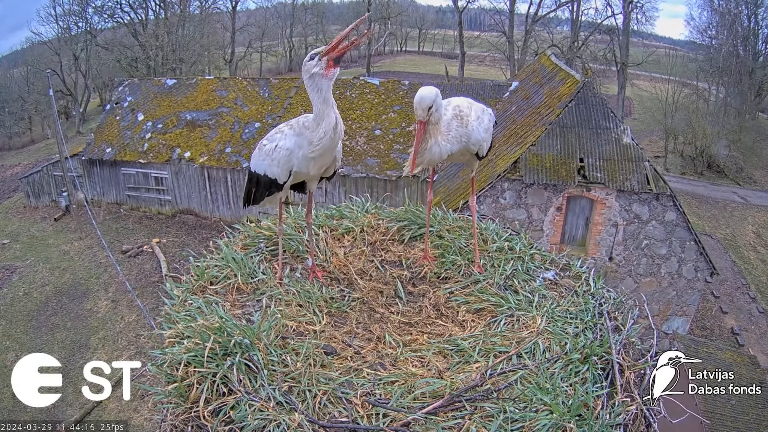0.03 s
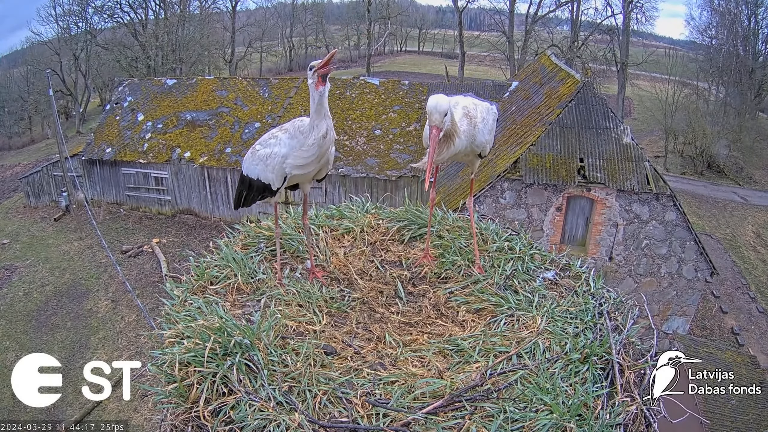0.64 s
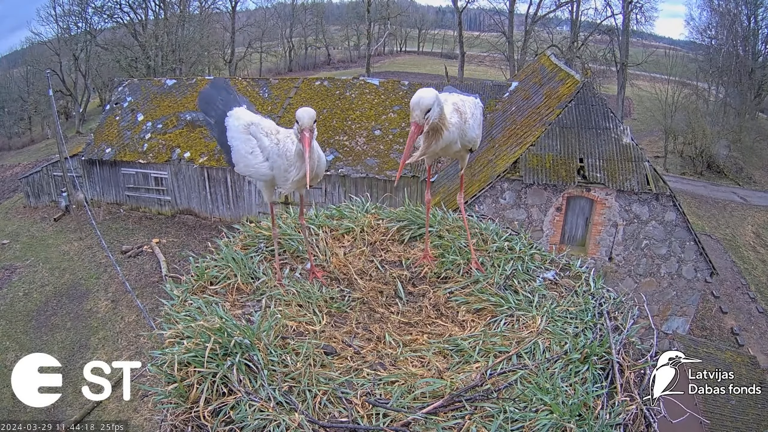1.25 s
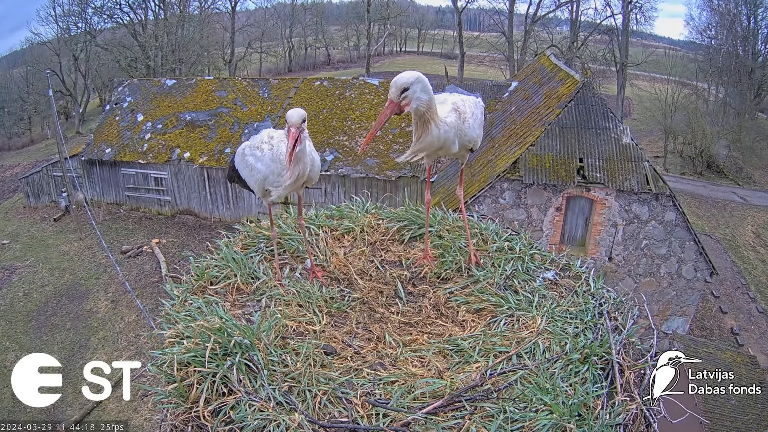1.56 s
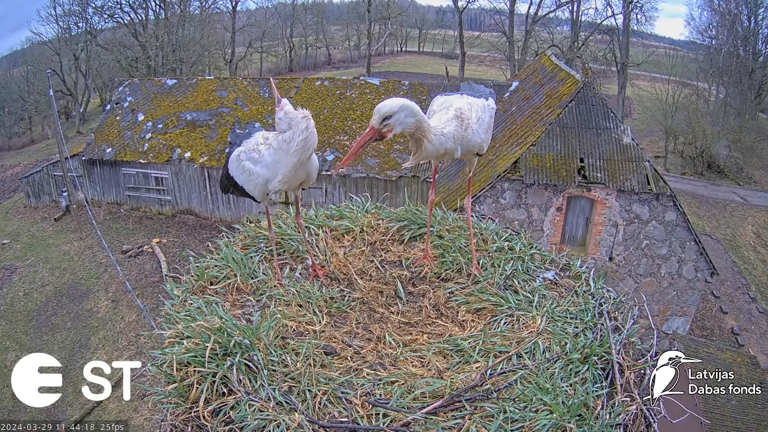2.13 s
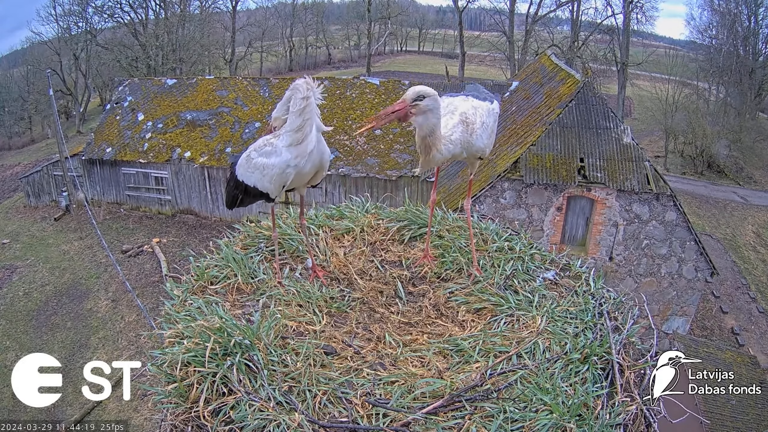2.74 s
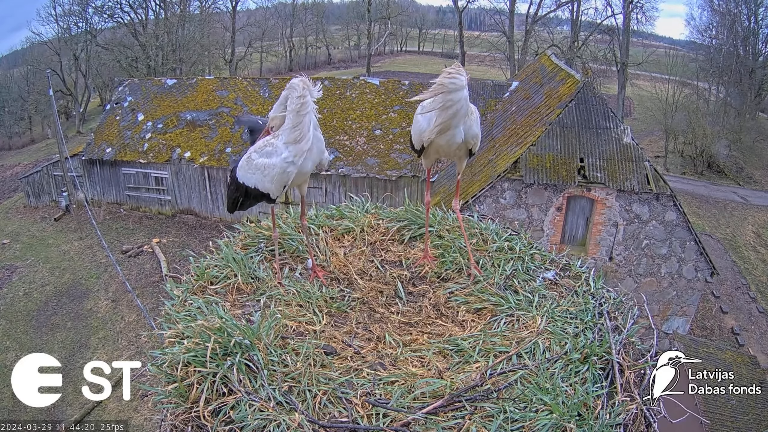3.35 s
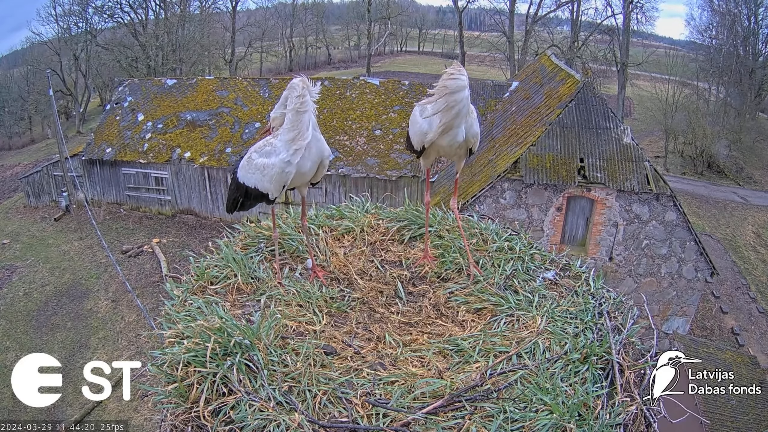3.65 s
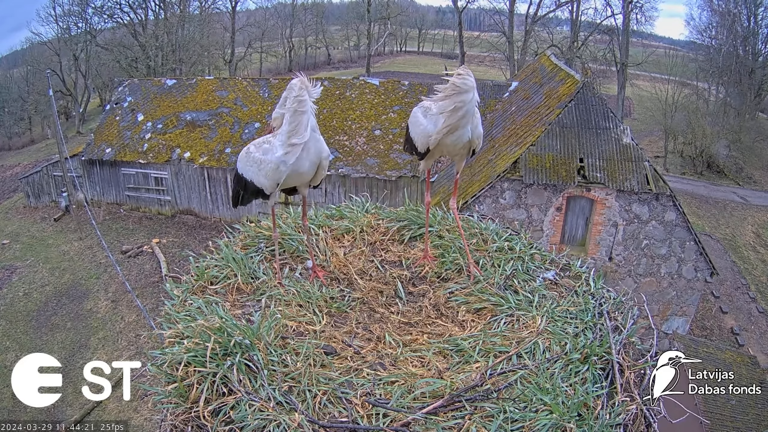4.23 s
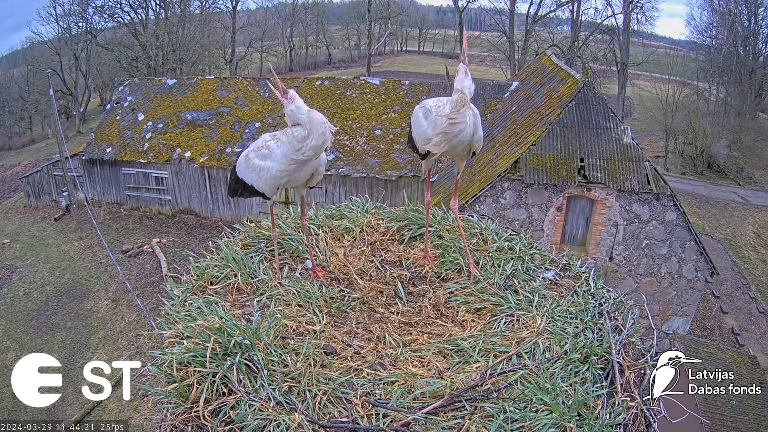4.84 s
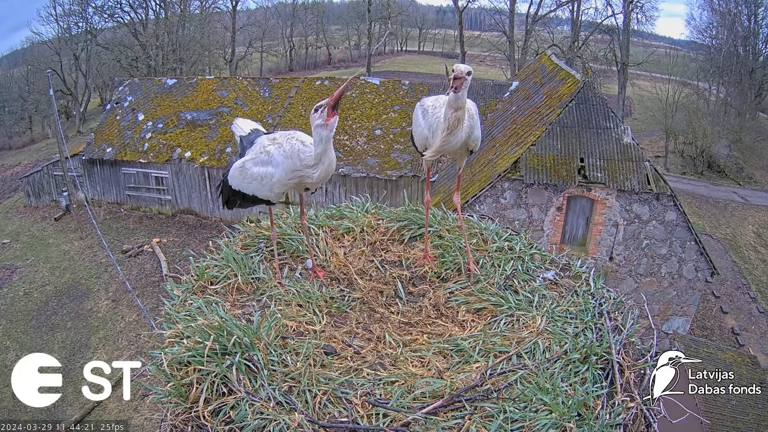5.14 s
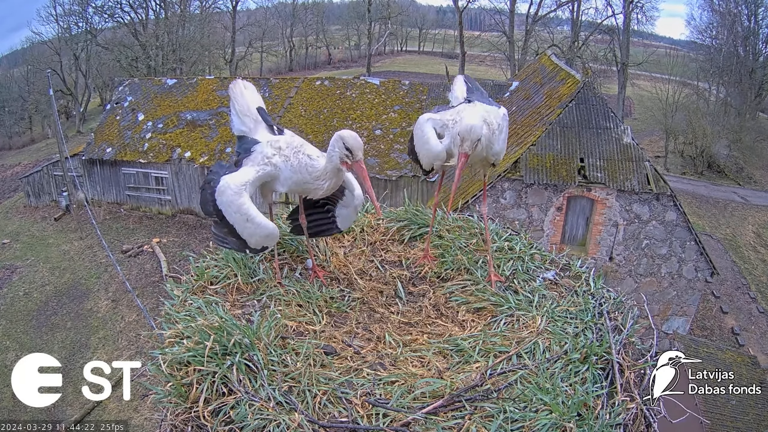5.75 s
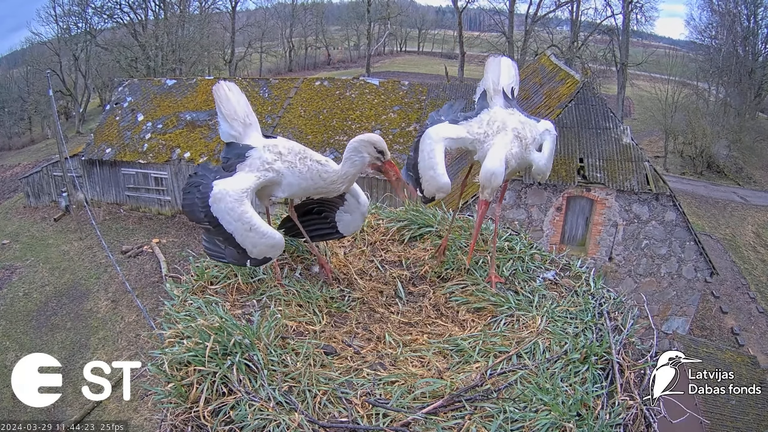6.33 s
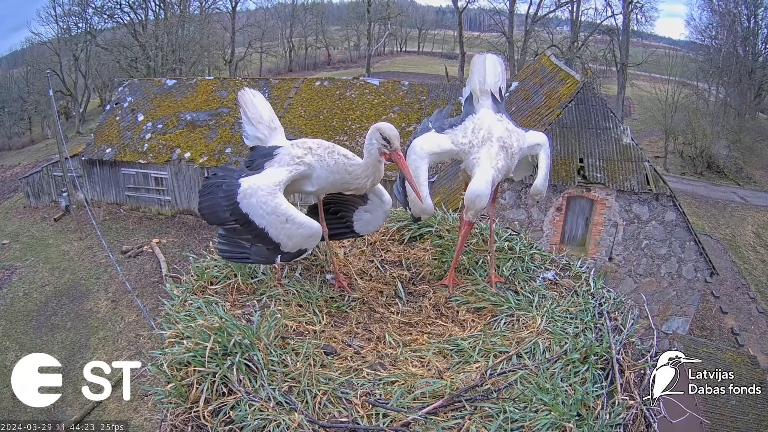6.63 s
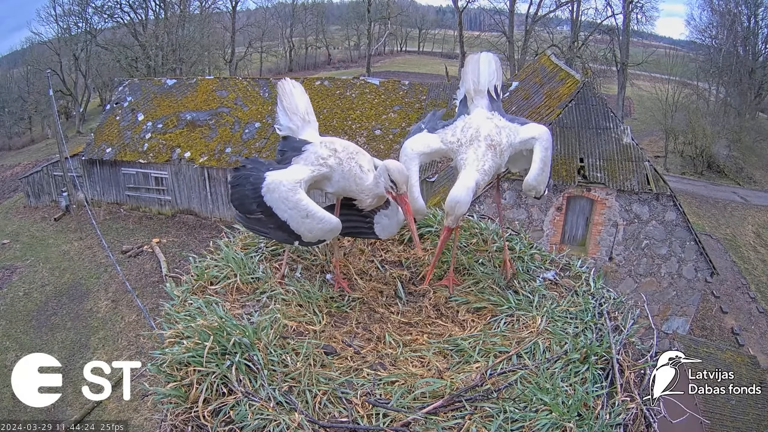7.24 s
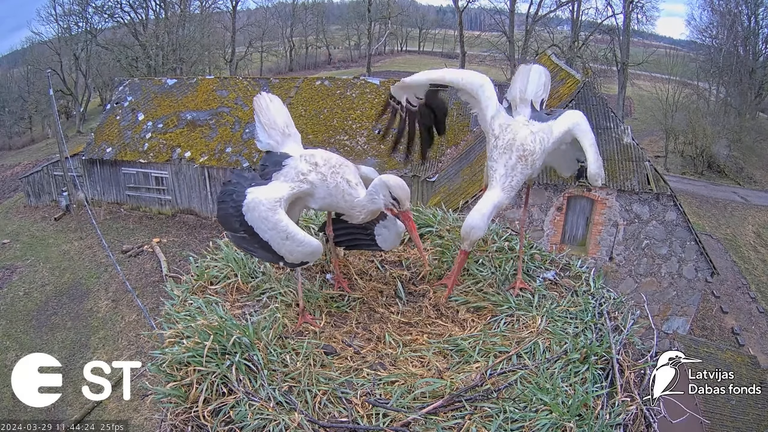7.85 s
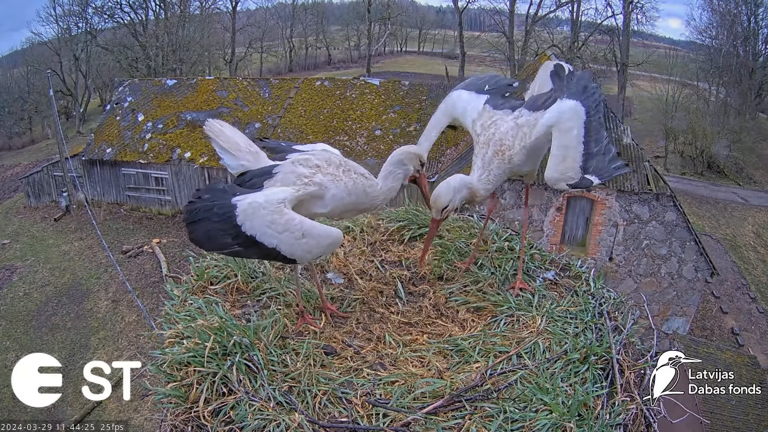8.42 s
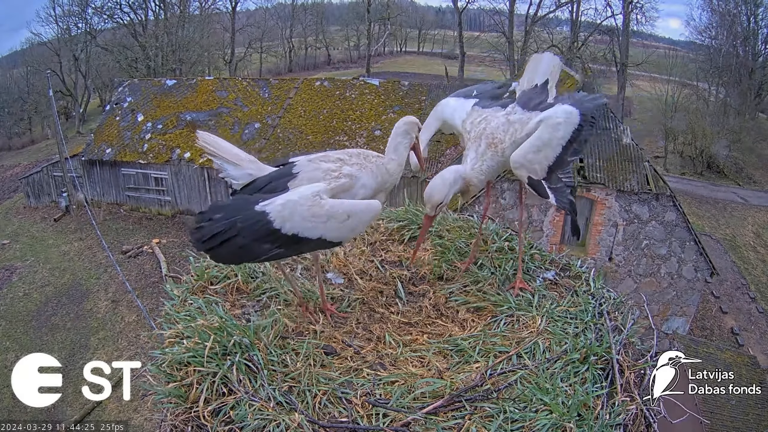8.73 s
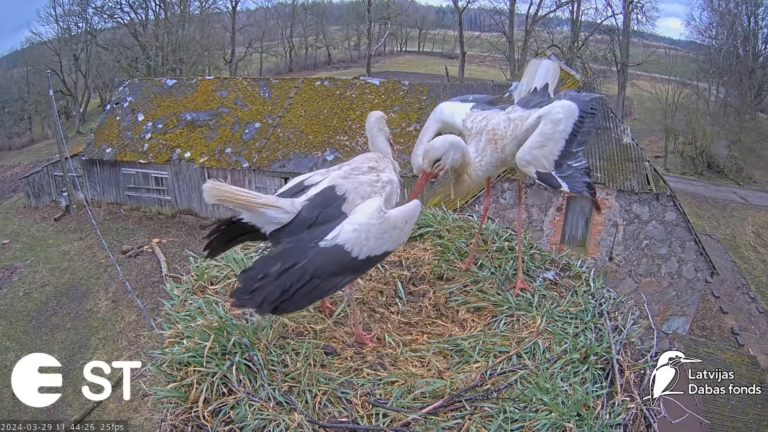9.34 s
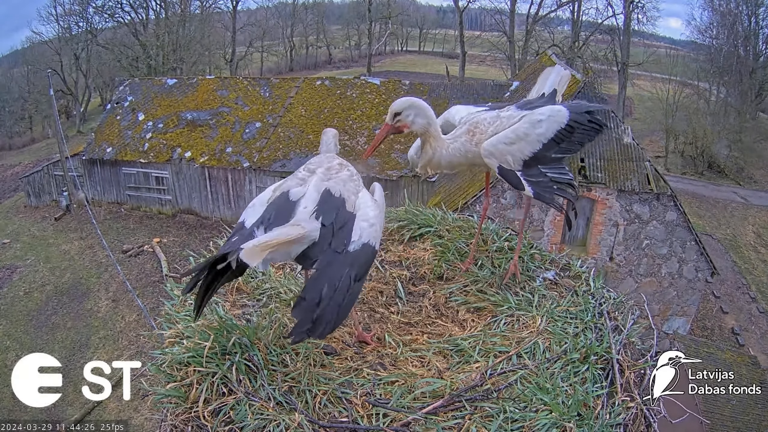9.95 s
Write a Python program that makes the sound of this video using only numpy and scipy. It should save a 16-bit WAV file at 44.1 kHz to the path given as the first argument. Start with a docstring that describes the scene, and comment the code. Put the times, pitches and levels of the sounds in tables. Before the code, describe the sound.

After a short hiss, a pair of storks keep up a fast, dry bill clattering outdoors over soft gusts of wind.

```python
"""A short hiss over light wind, then two white storks clatter their bills on a rooftop nest.
Each speeds up while it throws its head back; they drift in and out of step. A clap is a dry tick
plus a short swelling ring of bill, throat and pouch, whose pitches follow the neck's posture.
Feathers rustle, gusts buffet the microphone, a songbird trills far off."""
import sys
import numpy as np
from scipy import signal
from scipy.fft import rfft, irfft, next_fast_len
from scipy.io import wavfile
from scipy.ndimage import uniform_filter1d

SR = 44100
rng = np.random.default_rng(int(sys.argv[2]) if len(sys.argv) > 2 else 0)


def store_pcm(level_fs):
    """Save levels as 16-bit WAV."""
    pcm = np.round(np.clip(level_fs, -1, 1) * 32767).astype(np.int16)
    wavfile.write(sys.argv[1], SR, np.atleast_2d(pcm).T)


N = 440118
CLAP_SAMPLES = 1024
TIME_S, AGE_S = np.arange(N) / SR, np.arange(CLAP_SAMPLES) / SR

# spectra of outdoor air, wind rumble, feathers and straw, hiss: f/Hz, level/dB
AIR_SPECTRUM = [(100, -7.5), (400, -2), (1100, -2), (1800, -0.5), (2600, 14), (3500, 2.5), (6000, -7),
                (9000, -13), (13500, -8.5)]
WIND_SPECTRUM = [(15, 3.5), (28, 7), (50, -4.5), (100, -16.5), (200, -30.5), (400, -41.5), (1000, -73)]
RUSTLE_SPECTRUM = [(800, -31), (2000, 15.5), (2800, 19.5), (3600, -1), (4700, 4), (6500, -11),
                   (9000, -15.5), (14000, -40)]
HISS_SPECTRUM = [(290, -85), (500, -66), (898, -31), (1360, -12), (2250, -17.5), (2560, 3.5), (2820, -9.5),
                 (3880, -7), (5200, -22.5), (8590, -31), (14000, -56)]
# spectra of small eddies and of the farmyard's echo: f/Hz, level/dB
EDDY_SPECTRUM = [(40, -14.5), (110, 11), (250, 0), (500, -11.5), (1500, -54.5)]
YARD_SPECTRUM = [(300, 7.5), (1700, -12), (2350, -2), (2750, .5), (4500, -14), (9000, -14)]
# songbird trills: start/s, end/s, note onset f/Hz
TRILLS = [(0.039, 0.094, 3610), (1.899, 2.15, 4370), (3.797, 4.849, 4830), (8.528, 9.5, 4700)]
# wind gusts: t/s, relative peak level/dB, half width/s
GUSTS = [(0.847, -32.5, .05), (1.296, -33, 0.18), (1.78, -24, 0.14), (3.098, -38, 0.54), (3.398, -35, .06),
         (3.85, -26.5, .07), (4.383, -33, 0.12), (4.688, -32, .03), (5.482, -25.5, 0.18),
         (6.09, -24.5, 0.07), (6.978, -28.5, 0.33), (7.279, -27.5, 0.051), (7.514, -27.5, 0.019),
         (8.724, -29, .08), (9.02, -35, 0.15), (9.75, -30, 0.035)]
# stirring of feathers and straw: t/s, relative level/dB
RUSTLE_LEVELS = [(.5, -68.5), (1.2, -54), (2.7, -61.5), (4.1, -56.5), (5, -59), (5.4, -46), (5.8, -72),
                 (6.85, -52), (7.4, -68), (9, -58.5), (9.98, -88.5)]
# horn edges meeting: f/Hz, level with bill down/dB, boost with head back/dB
TICK_SPECTRUM = [(200, -54, 1.5), (330, -22.5, 14), (484, -18, 22), (820, -19, 16), (1318, -10, 19),
                 (1650, 4.5, 8.5), (3560, -1.5, 5), (3880, -5, 11), (4260, 2, 8), (5340, -5.5, 11),
                 (6690, -12, 9), (6900, -9.5, 7), (7480, -12.5, 9), (9790, -23, 12.5), (11800, -27, 7.5),
                 (14200, -34.5, 8)]
# runs of claps, each lasting until the next: start/s, claps, slowing per clap/ms
LEAD_RUNS = [(.5247, 2, 2.5), (.7646, 6, 0), (1.431, 4, -2.5), (1.8699, 4, 0.5), (2.2941, 4, -1.45),
             (2.7026, 4, -4), (3.0414, 10, 0.34), (3.8371, 5, 0.44), (4.2553, 8, 1.6), (4.9815, 5, 1.5),
             (5.489, 6, -.5), (6.1067, 6, 0), (6.7246, 10, 0.04), (7.7761, 4, 1), (8.206, 4, -0.14),
             (8.6235, 6, 0.6), (9.2767, 4, -1), (9.7077, 2, 6.5), (9.9344, 1, 3)]
MATE_RUNS = [(.3326, 2, -5.5), (.4911, 7, -0.27), (1.5264, 3, -2), (1.9531, 4, -8.5), (2.427, 7, 0),
             (3.1384, 11, 0.38), (4.269, 4, 5), (4.7137, 4, 4), (5.25, 3, 5.5), (5.6869, 5, -0.04),
             (6.4238, 6, 0.66), (7.3306, 4, -0.6), (7.9239, 2, -14), (8.2194, 5, 3), (8.9694, 4, 3.5),
             (9.5494, 1, -5.5)]
# bill ring as effort and gape change: t/s, level/dB, f/Hz
LEAD_BILL = [(.52, -7, 2400), (.8, -6.5, 2326), (1.45, -7.5, 2287), (1.8, -11, 2290), (2.15, -11.5, 2385),
             (2.65, -13.5, 2464), (2.85, -10.5, 2413), (3.22, -18, 2300), (3.7, -15.5, 2368),
             (4.65, -13, 2385), (5.1, -9.5, 2427), (5.9, -5, 2432), (6.85, -6.5, 2367), (7.6, -5, 2473),
             (8.05, -9.5, 2367), (8.6, -14, 2417), (9.3, -7, 2470), (9.7, -20.5, 2610)]
MATE_BILL = [(.42, -33, 2500), (.49, -19.5, 2500), (.94, -25, 2710), (1.08, -17, 2130), (1.9, -28, 2080),
             (2.2, -23.5, 2560), (4.1, -23, 2620), (4.6, -35.5, 2660), (4.84, -21, 2670), (4.97, -18, 2100),
             (5.25, -17, 2080), (5.54, -8.5, 2620), (7.2, -8, 2527), (7.48, -8.5, 2310), (7.92, -7.5, 2200),
             (8.37, -45.5, 2680), (8.81, -18.5, 2430), (8.97, -29.5, 2500), (9.55, -44.5, 2460)]
# throat ring as the neck bends: t/s, level/dB re bill, f/Hz
LEAD_THROAT = [(.52, -5.5, 1840), (.8, -8.5, 1716), (2.18, -3, 1700), (2.4, 0.5, 2090), (2.68, 2, 2070),
               (2.95, -12, 1694), (3.3, -7, 1370), (4.6, -14.5, 1620), (5.18, -10, 1530), (5.38, -4, 1837),
               (6.5, -7, 1815), (6.75, -7.5, 1670), (8.1, -4.5, 1780), (8.55, 2, 1890), (9.25, -4.5, 1690),
               (9.45, -7, 1780), (9.62, 3, 2005)]
MATE_THROAT = [(.4, 4, 1970), (.5, -3, 1840), (.94, 6.5, 1960), (1.08, -24, 1740), (1.65, -5, 1740),
               (2.1, 2.5, 1950), (2.85, -14, 1830), (4.2, -9.5, 1760), (4.7, -1.5, 1870), (5.1, -13, 1670),
               (5.6, -10.5, 2070), (6.3, -8.5, 2190), (7.3, -4.5, 2230), (7.5, -15, 1870),
               (7.9, -18.5, 1890), (8.1, 6, 2200), (9, -8, 2210)]
# bill overtone: t/s, level/dB re bill
LEAD_OVERTONE = [(.5, -8), (1, -3.5), (2.1, -3.5), (2.5, 0.5), (3.4, -16.5), (5, -10), (7.9, -8),
                 (8.4, -11.5), (9.45, -8), (9.7, -30)]
MATE_OVERTONE = [(.5, -68), (1.2, -15), (2.9, -14), (3.3, -23), (4.8, -21), (5.05, -2.5), (5.6, -21),
                 (6.2, -32), (8, -11.5)]


def from_db(db):
    """Decibels to gain."""
    return 10 ** (np.asarray(db) / 20)


def at_time(rows, t_s):
    """A table's value columns, interpolated at t_s."""
    times_s, *columns = np.transpose(rows)
    return [np.interp(t_s, times_s, column) for column in columns]


def coloured(x, spectrum):
    """Minimum-phase filter following rows of f/Hz, level/dB."""
    size = 2 * next_fast_len(len(x))
    hz, db = np.transpose(spectrum)
    grid_hz = np.maximum(np.arange(size // 2 + 1) * SR / size, 1)
    cepstrum = irfft(np.log(from_db(np.interp(np.log(grid_hz), np.log(hz), db))))
    cepstrum[1:size // 2] *= 2
    cepstrum[size // 2 + 1:] = 0
    return irfft(rfft(x, size) * np.exp(rfft(cepstrum)))[:len(x)]


def noise(spectrum):
    """Steady coloured noise, rms 1."""
    x = coloured(rng.standard_normal(N), spectrum)
    return x / np.sqrt(np.mean(x ** 2) + 1e-20)


def drift(rate_hz):
    """Random wander, spread near 1."""
    knots = rng.standard_normal(4096)
    return np.interp(TIME_S * rate_hz, np.arange(len(knots)), knots)


def swell(start_s, end_s, attack_s, release_s):
    """Gaussian rise, hold at 1, Gaussian fall."""
    outside = np.maximum((start_s - TIME_S) / attack_s, (TIME_S - end_s) / release_s)
    return np.exp(-np.clip(outside, 0, 10) ** 2)


def farmyard(x, scatter_db, t60_s):
    """Roofs and trees scatter a thin tail."""
    age_s = TIME_S[:2 * SR]
    tail = rng.standard_normal(len(age_s)) * from_db(-60 * age_s / t60_s) * (1 - np.exp(-age_s / .011))
    tail *= from_db(scatter_db) / np.sqrt(np.sum(tail ** 2))
    return signal.fftconvolve(x, coloured(tail, YARD_SPECTRUM))[:N]


def nest(x, scatter_db, fade_s):
    """Straw and twigs reflect a blur within milliseconds."""
    blur = rng.standard_normal(CLAP_SAMPLES) * AGE_S * np.exp(-AGE_S / fade_s)
    return signal.fftconvolve(x, from_db(scatter_db) * blur / np.sqrt(np.sum(blur ** 2)))[:N]


def songbird(level_db, fall_per_s, note_s, period_s):
    """Runs of short falling whistles from far trees; no two alike."""
    out, age_s = np.zeros(N + SR), TIME_S[:SR // 8]
    envelope = np.sin(np.pi * np.minimum(age_s / note_s, 1)) ** 2
    chance = rng.standard_normal((len(TRILLS), 64, 4))
    for (start_s, end_s, hz), notes in zip(TRILLS, chance):
        for t_s, luck in zip(np.arange(start_s, end_s, period_s), notes):
            pitch_hz = hz * from_db(luck[0] / 2) * np.exp(-fall_per_s * (1 + luck[2] / 2) * age_s)
            whistle = np.sin(2 * np.pi * np.cumsum(pitch_hz) / SR)
            at = int(max(t_s + period_s * luck[3] / 5, 0) * SR)
            out[at:at + len(age_s)] += from_db(level_db + 2 * luck[1]) * envelope * whistle
    return out[:N]


def wind(breeze_db, buffet_db, rumble_gain_db, eddy_db):
    """Rumble on the microphone; strong gusts also shed smaller, higher eddies."""
    gust_power = sum((from_db(db) * swell(t_s, t_s, half_s, half_s)) ** 2 for t_s, db, half_s in GUSTS)
    gust_db = 10 * np.log10(from_db(breeze_db) ** 2 + gust_power)
    rumble = noise(WIND_SPECTRUM)
    rumble /= np.sqrt(uniform_filter1d(rumble ** 2, size=SR // 5) + .098)   # even out its own swells
    rumble *= from_db(gust_db + rumble_gain_db)
    buffet = from_db(buffet_db * drift(30))
    eddies = noise(EDDY_SPECTRUM) * from_db(buffet_db * drift(71))
    eddies *= from_db(eddy_db + 1.36 * (gust_db + 31.5))
    return buffet * (rumble + eddies)


def rustle(gain_db, flicker_db):
    """Feathers and straw: flickering noise."""
    level_db, = at_time(RUSTLE_LEVELS, TIME_S)
    return from_db(level_db + gain_db + flicker_db * drift(30)) * noise(RUSTLE_SPECTRUM)


def hiss(level_db):
    """One puff of noise opens the display."""
    return from_db(level_db) * swell(.3555, .382, attack_s=.029, release_s=.033) * noise(HISS_SPECTRUM)


def ring(hz, swell_s, glide=0):
    """Horn coupled to an air cavity swells to 1 and dies; glide lifts the pitch as the gape closes."""
    pitch_hz = hz * (1 + glide * (np.tanh(AGE_S / swell_s / 2) - .5))
    envelope = AGE_S / swell_s * np.exp(1 - AGE_S / swell_s)
    return envelope * np.sin(2 * np.pi * np.cumsum(pitch_hz) / SR)


def tick(spectrum, touch_s, touch_db, grain_db, grain_s, bounce_s):
    """Mandibles touch, slam, grate and bounce once. Returns sound (rms 1 over 2 ms) and slam index."""
    luck = rng.standard_normal(4)
    slam = int(touch_s * SR * from_db(luck[0]))
    decay = np.exp(-np.maximum(AGE_S - AGE_S[slam], 0) / grain_s)
    force = rng.standard_normal(CLAP_SAMPLES) * from_db(grain_db + 2 * luck[1]) * decay
    force[:slam] *= from_db(touch_db)
    force[0] += from_db(touch_db)
    force[slam] += 1
    force[slam + int(bounce_s * SR * from_db(luck[2]))] += from_db(2 * luck[3])
    sound = coloured(force, spectrum)
    return sound / np.sqrt(np.sum(sound ** 2) / (.002 * SR)), slam


def clap_times(runs):
    """Within a run the gap between claps grows or shrinks evenly."""
    times_s = []
    for (start_s, count, slowing_ms), (end_s, _, _) in zip(runs, runs[1:]):
        k = np.arange(count)
        even_s = start_s + (end_s - start_s) * k / count
        times_s.extend(even_s + slowing_ms / 1000 * k * (k - count) / 2)
    return np.array(times_s + [runs[-1][0]])


def display(runs, bill, throat, overtone, throw_s, tick_gain_db, tick_limit_db, swing_s=.6):
    """One bird's claps, a row each; posture goes from 0 (bill down) to 1 (head back) and returns."""
    t_s = clap_times(runs)
    luck = rng.standard_normal((len(t_s), 5)).T
    posture = np.clip(np.minimum(t_s - throw_s[0], throw_s[1] - t_s) / swing_s, 0, 1)
    bill_db, bill_hz = at_time(bill, t_s)
    throat_db, throat_hz = at_time(throat, t_s)
    overtone_db, = at_time(overtone, t_s)
    bill_db += .8 * luck[0]
    # the tick grows with force, levelling off in hard claps
    force_db = bill_db + 10 * np.log10(1 + from_db(throat_db) ** 2)
    tick_db = -10 * np.log10(from_db(force_db + tick_gain_db) ** -2 + from_db(tick_limit_db) ** -2)
    bill_hz *= 1 + .007 * luck[1]
    throat_hz *= 1 + .007 * luck[2]
    throat_db += .8 * luck[3]
    overtone_db += 2.5 * luck[4]
    return np.column_stack([t_s, posture, bill_db, bill_hz, throat_hz, throat_db, overtone_db, tick_db])


def clatter(claps, bill_s, glide, throat_s, overtone_s, overtone_ratio,
            pouch_hz, pouch_s, pouch_db, pouch_follow, **contact):
    """Each clap ticks and rings the bill, the throat and the slack throat pouch."""
    out = np.zeros(N + 2 * CLAP_SAMPLES)
    chance = rng.standard_normal((len(claps), 4))
    tick_hz, bill_down_db, head_back_db = np.transpose(TICK_SPECTRUM)
    for clap, luck in zip(claps, chance):
        t_s, posture, bill_db, bill_hz, throat_hz, throat_db, overtone_db, tick_db = clap
        sustain = from_db(.5 * luck[0])
        # neck bent back: bill rings longer, throat is damped, pouch pitch rises
        body = ring(bill_hz, bill_s * sustain * from_db(1.4 * posture), glide)
        body += from_db(throat_db) * ring(throat_hz, throat_s * sustain * from_db(-4.5 * posture))
        body += from_db(overtone_db) * ring(overtone_ratio * bill_hz, overtone_s)
        pouch = ring(pouch_hz * (1 + .023 * posture) * from_db(luck[2] / 10), pouch_s)
        # the soft pouch varies less in level than the hard bill and swings against it
        pouch *= from_db(pouch_db + pouch_follow * (bill_db + throat_db / 2) + luck[1])
        at = round(t_s * SR)
        out[at:at + CLAP_SAMPLES] += from_db(bill_db) * body - pouch
        tilt_db = 1.8 * luck[3] * np.log10(tick_hz)
        sparkle_db = 8 * np.exp(-((t_s - 4.45) / .55) ** 2) * (tick_hz > 11500)   # top brightens briefly
        colour_db = bill_down_db + posture * head_back_db + tilt_db + sparkle_db
        snap, slam = tick(np.column_stack([tick_hz, colour_db]), **contact)
        touch = at - slam // 2   # the ring starts between touch and slam
        out[touch:touch + CLAP_SAMPLES] += from_db(tick_db) * snap
    return out[:N]


def scene():
    """Two storks on the nest, farmyard and wind around them; mono."""
    lead_claps = display(LEAD_RUNS, LEAD_BILL, LEAD_THROAT, LEAD_OVERTONE,
                         throw_s=(2.02, 5.4), tick_gain_db=-10, tick_limit_db=-14)
    mate_claps = display(MATE_RUNS, MATE_BILL, MATE_THROAT, MATE_OVERTONE,
                         throw_s=(1.95, 5.1), tick_gain_db=-8.5, tick_limit_db=-27.5)
    lead = clatter(lead_claps, bill_s=.0014, glide=.01, throat_s=.0014,
                   overtone_s=.00081, overtone_ratio=1.185,
                   pouch_hz=675, pouch_s=.0015, pouch_db=-23.5, pouch_follow=.46,
                   touch_s=.0013, touch_db=-12, grain_db=-21, grain_s=.0029, bounce_s=.0015)
    mate = clatter(mate_claps, bill_s=.0016, glide=.17, throat_s=.0015,
                   overtone_s=.0012, overtone_ratio=1.288,
                   pouch_hz=815, pouch_s=.0013, pouch_db=-20.5, pouch_follow=.58,
                   touch_s=.00041, touch_db=-6.5, grain_db=-10, grain_s=.0031, bounce_s=.0023)
    storks = lead + mate + hiss(level_db=-36)
    feathers = rustle(gain_db=-1, flicker_db=6.5)
    air = from_db(-64.5) * noise(AIR_SPECTRUM)
    song = songbird(level_db=-59, fall_per_s=9.7, note_s=.042, period_s=.06)
    song += farmyard(song, scatter_db=4, t60_s=.5)
    echoes = nest(storks, scatter_db=-20.5, fade_s=.0024) + farmyard(storks, scatter_db=-26, t60_s=1)
    gusts = wind(breeze_db=-41, buffet_db=3, rumble_gain_db=1.5, eddy_db=-54)
    return (storks + echoes + song + feathers + air + gusts)[None]


def record(dry):
    """Soft peak limiting; band 14 Hz to 14 kHz."""
    rounded = dry / (1 + dry ** 6) ** (1 / 6)
    low_cut = signal.sosfilt(signal.butter(2, 14, "high", fs=SR, output="sos"), rounded)
    return signal.sosfilt(signal.ellip(8, .2, 60, 14000, fs=SR, output="sos"), low_cut)


dry = scene()
out = record(dry)
store_pcm(out)
```